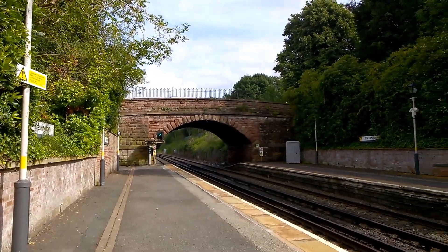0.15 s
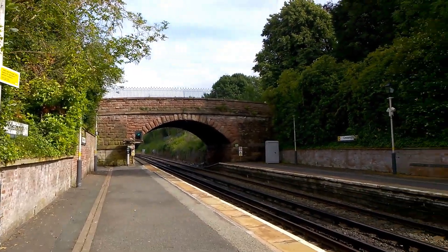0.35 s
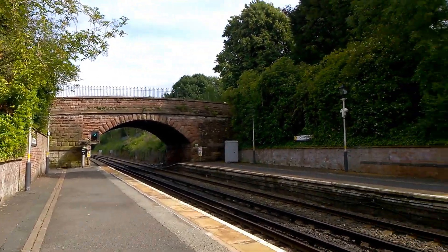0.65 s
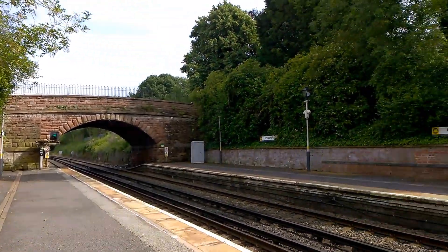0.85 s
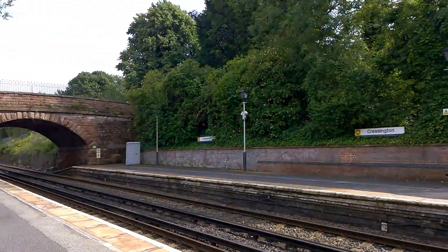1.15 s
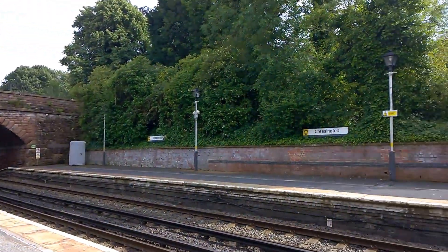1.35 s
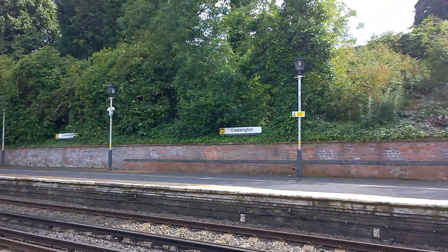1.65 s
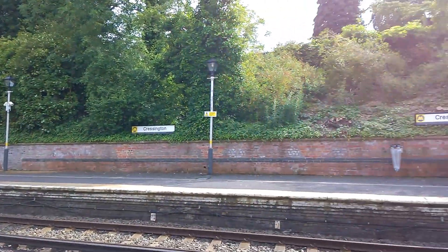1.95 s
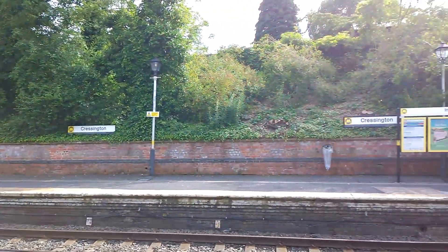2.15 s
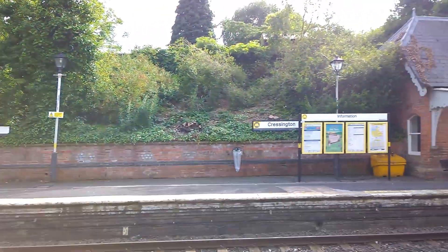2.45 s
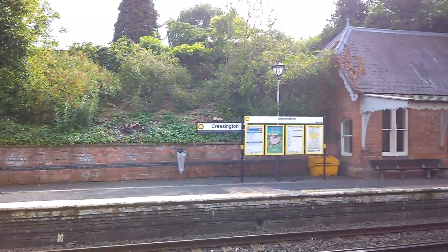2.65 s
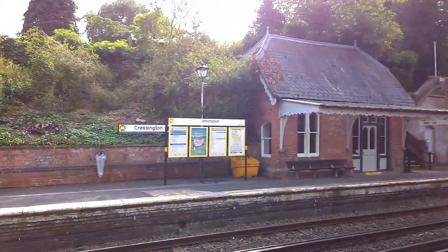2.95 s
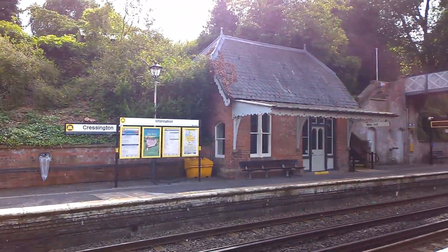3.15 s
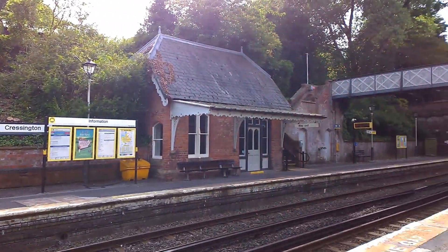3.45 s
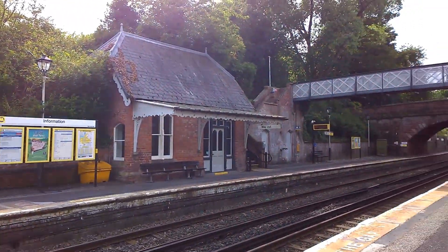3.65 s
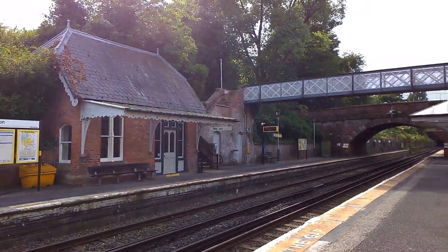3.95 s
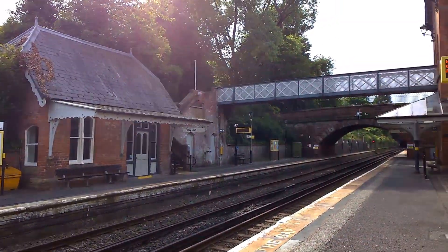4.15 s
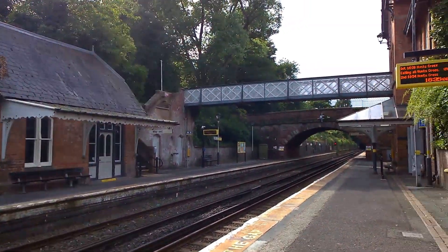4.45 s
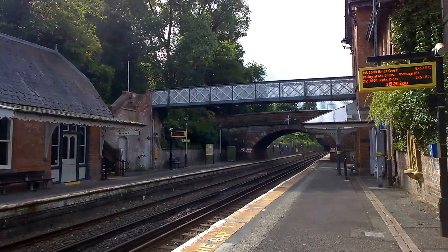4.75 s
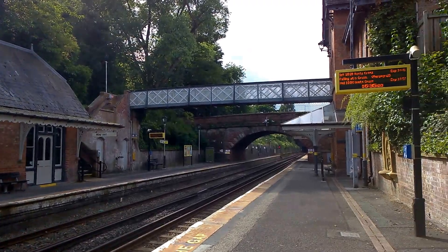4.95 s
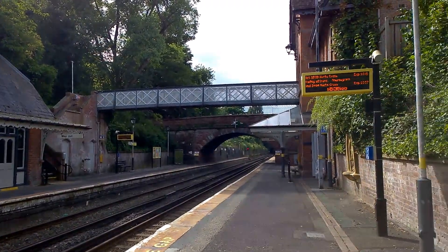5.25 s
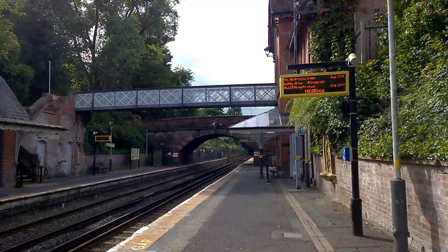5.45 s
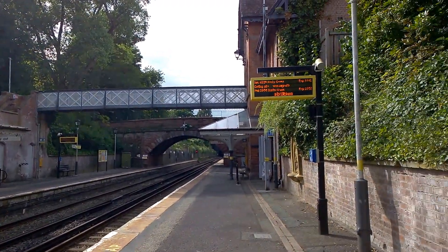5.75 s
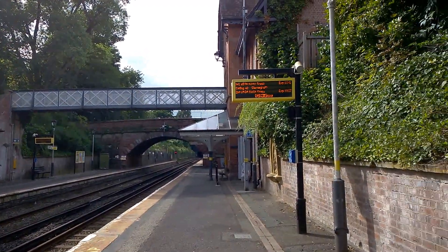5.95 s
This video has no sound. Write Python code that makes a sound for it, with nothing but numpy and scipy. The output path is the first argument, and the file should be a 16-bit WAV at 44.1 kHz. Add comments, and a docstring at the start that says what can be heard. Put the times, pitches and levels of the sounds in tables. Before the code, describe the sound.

Quiet railway platform between walls: faint hiss, leaf rustle to the right, a dull knock and low wind rumble come first. Then a pigeon coos to the end in smooth arching notes with gravelly moments, close to centre, softly echoed. A high buzzy chirp marks the start of the cooing and another comes near the end. Small scuffs and ticks occur sporadically; a weak far whine swells on the right. Open stereo microphone.

```python
"""Pigeon at a railway platform

A pigeon coos low, arching notes in a walled cutting: nearly pure tones that break into throaty flutter.
The walls return each coo as a slap and a short tail of scattered noise echoes.
Two thin bird calls mix a whistle with a buzz of narrow noise; light scuffs are short resonant noise bursts.
Behind lie a faint far whine (tone plus noise), a low rumble, a dull knock, and air and leaf hiss, all shaped noise."""
import sys
import numpy as np
from scipy import signal
from scipy.fft import rfft, irfft, next_fast_len
from scipy.io import wavfile

SR = 44100
rng = np.random.default_rng(int(sys.argv[2]) if len(sys.argv) > 2 else 0)


def master_out(mix):
    """Clip the mix to full scale and print it as 16-bit PCM to the path in sys.argv[1]."""
    frames = np.transpose(np.atleast_2d(mix))
    ceiling = np.clip(frames, -1, 1)
    pcm = np.round(ceiling * 32767).astype(np.int16)
    wavfile.write(sys.argv[1], SR, pcm)


N = 269010
T = np.arange(N) / SR
SIZE = next_fast_len(N + SR // 10, real=True)  # padded, so that filter tails do not wrap round
FREQS = np.fft.rfftfreq(SIZE, 1 / SR)

# Coos, each an arch of pitch; a fall shape over 1 holds the crest longer.
# Each row: start, crest and end in seconds, start, crest and end pitch in Hz before the scoop, fall shape,
# attack in seconds, first and last base level in dB, strain at the crest from 0 to 1.
COO_ROWS = [(1.583, 1.889, 2.11, 353.2, 629.4, 524.4, 2.65, 0.074, -39.5, -38.5, 0),
            (2.33, 2.417, 2.696, 487, 644.2, 383.6, 1.33, 0.054, -39, -39, 0),
            (2.997, 3.064, 3.292, 504, 540.6, 438.3, 2, 0.036, -36.5, -41.5, 0.05),
            (3.29, 3.414, 3.625, 439.5, 484, 373.7, 1.7, 0.065, -40, -38.5, 0.07),
            (3.866, 4.057, 4.074, 483.8, 564.2, 534, 2.3, 0.031, -33.5, -44, 0),
            (4.355, 4.651, 4.95, 496, 586.4, 494.7, 3, 0.045, -40, -39, 1),
            (5.148, 5.244, 5.513, 474, 648.7, 427, 0.72, 0.026, -42.5, -37, 0.75),
            (5.855, 5.9, 6.205, 500, 524.3, 419.6, 1.25, 0.041, -36, -42, 0.01)]
# Brief catches in the voice, all equally deep. Each entry: time in seconds.
CATCH_TIMES_S = [1.669, 1.734, 3.09, 3.148, 3.175, 3.424, 4.056, 4.861, 5.355, 5.404, 6.009]
# What the crop lets through. Each row: frequency in Hz, gain in dB.
CROP_GAIN_DB = [(100, -8), (160, -6.5), (205, -16.5), (280, -4), (335, -6), (400, 1), (645, -2.5),
                (700, -12.5), (770, -1), (950, -8), (1150, -3.5), (1600, -11)]
SCOOP_HZ, SCOOP_S = 84.7, 0.01335  # every coo slides in from below
# Near the pitch the swollen crop favours, the note is loud and pure.
SWEET_HZ, SWEET_WIDTH_HZ, SWEET_DB, SWEET_ROUGH, PLAIN_ROUGH = 523.6, 20.6, 4.5, 0.021, 0.34
# At low pitch the voice goes slack: weaker and rougher.
SLACK_HZ, SLACK_RANGE_HZ, SLACK_DB, SLACK_ROUGH = 518.5, 82, -7.5, 0.46
# Strain at the crest chokes the note and breaks it into flutter.
STRAIN_DB, STRAIN_ROUGH, STRAIN_POWER = -9, 0.8, 3.1
CATCH_DEPTH, CATCH_S, RELEASE_S = 0.98, 0.0047, 0.022
THROB_HZ, THROB_DB, THROB_JITTER = 29.08, 3, 0.4
FLUTTER_HZ, FLUTTER_JITTER, FLUTTER_JITTER_HZ = 52, 0.2963, 35.24
FLUTTER_DEPTH, FLUTTER_BEND_RAD, RASP = 0.62, 0.08, 0.95  # at full roughness

# Thin calls of a small bird.
# Each row: peak in seconds, level in dB before placing, rise and fall in seconds, buzz up to the peak from 0 to 1.
TWEET_ROWS = [(1.57, -65.5, 0.068, 0.093, 0.68), (6.086, -56.5, 0.049, 0.11, 0.5)]
# After its peak a call breaks up into a lower buzz.
TWEET_HZ, BUZZ_HZ, LOW_BUZZ_HZ, BREAK_S, BROKEN_BUZZ = 5214, 5490, 5050, 0.044, 0.97

# Light scuffs and ticks. Each row: time in seconds, level in dB, centre in Hz, width in Hz,
# 60 dB decay in seconds, left minus right in dB.
SCUFF_ROWS = [(0.414, -46.5, 615, 990, 0.02, 1), (1.853, -55, 1040, 290, 0.089, -5),
              (2.38, -55, 1180, 450, .03, 3), (2.392, -48, 860, 439, 0.087, -3),
              (3.803, -58.5, 5340, 2160, .013, 16), (3.8054, -57, 12500, 6000, 0.0068, -4),
              (4.157, -51, 860, 397, 0.098, 4), (4.275, -53.5, 2050, 600, 0.16, -2),
              (4.278, -55, 1194, 300, 0.15, -8), (4.69, -53.5, 1030, 299, 0.18, -1)]

# Swells of the far whine. Each row: peak in seconds, level in dB before placing, rise and fall in seconds.
WHINE_SWELLS = [(0.19, -67.5, 0.079, 0.097), (2.95, -62, 0.45, 2.6), (3.35, -57.5, 0.16, 0.075),
                (3.86, -57.5, 0.067, 0.1), (4.14, -58, 0.1, 0.074), (5.25, -55.5, 0.068, 0.1),
                (6.03, -70, 0.082, 0.23)]
# Hiss around the whine. Each row: frequency in Hz, relative gain in dB.
WHINE_HISS_DB = [(750, -5.5), (900, -5), (1050, 1), (1200, 9), (1450, -13), (2100, -5.5), (2700, -36.5)]
WHINE_HZ, WHINE_WAVER_HZ, WHINE_WAVER_DB = 862, 31, 2.5

# Gusts on the microphone. Each row: peak in seconds, level in dB before the rumble gains, rise and fall in seconds.
GUST_SWELLS = [(0.21, -42, 0.15, 0.13), (1.12, -45.5, 0.16, 0.29), (1.94, -48, 0.06, 0.3),
               (2.68, -50, 0.082, 0.29), (3.43, -49, 0.18, 0.16), (3.77, -42.5, 0.18, 0.076),
               (4.31, -41, 0.086, 0.2), (5.08, -48.5, 0.086, 0.24), (5.72, -52, 0.06, 0.2)]
# Colour of the buffeting. Each row: frequency in Hz, relative gain in dB.
BUFFET_COLOUR_DB = [(8.8, -35), (15, 0), (38, -0.5), (57, -3), (92, -17.5), (120, -24), (160, -51.5),
                    (260, -120)]
# Colour of the low hum. Each row: frequency in Hz, relative gain in dB.
HUM_COLOUR_DB = [(53, -36.5), (90, -0.5), (108, -5), (151, 3), (172, 0), (199, -8.5), (275, -3.5),
                 (325, -12.5), (420, -17), (720, -120)]
# Course of the low hum, with throaty husk beneath some coos.
# Each row: time in seconds, level in dB before waver and channel gains.
HUM_LEVEL_DB = [(0, -54.5), (1.15, -52), (1.55, -55), (1.93, -50.5), (2.6, -57.5), (3.45, -49), (4.6, -55),
                (5.3, -54.5), (6.1, -60)]
GUST_WAVER_HZ, GUST_WAVER_DB = 11, 1.35
BREEZE_DB, BREEZE_WAVER_HZ, BREEZE_WAVER_DB = -53.5, 5.7, 4.5  # light air between gusts, before rumble gains
HUM_WAVER_HZ, HUM_WAVER_DB = 7.2, 1.74

# Steady outdoor air. Each row: frequency in Hz, relative gain in dB.
AIR_COLOUR_DB = [(200, -8.5), (400, -9), (800, -7.5), (1000, -12.5), (1200, -9.5), (1550, -19),
                 (2100, -14.5), (2400, -14.5), (3000, -10.5), (4000, -24), (5900, -20.5), (7400, -31),
                 (10000, -32.5), (15500, -35.5)]
# Balance of the air. Each row: frequency in Hz, left minus right in dB.
AIR_BALANCE_DB = [(100, -1), (380, 2.5), (700, -4), (1300, -1), (2400, -6), (4400, -4), (8000, 0),
                  (15000, 2)]
# Faint dull swells, and the short thud of a knock at 0.42 s.
# Each row: peak in seconds, level in dB, rise and fall in seconds.
DULL_SWELLS = [(0.22, -60, 0.029, 0.062), (0.42, -56.5, 0.01, 0.012), (0.95, -59, 0.28, 0.12),
               (1.245, -53.5, 0.062, 0.07)]
# Stirs of leaves. Each row: peak in seconds, level in dB before waver and channel gains, rise and fall in seconds.
LEAF_SWELLS = [(0.01, -66, 0.1, 0.08), (0.8, -66, 0.36, 0.44), (1.4, -66, 0.63, 0.99),
               (2.25, -66, 0.26, 0.13)]
# Colour of the leaves. Each row: frequency in Hz, relative gain in dB.
LEAF_COLOUR_DB = [(1700, -38.5), (2100, -17.5), (2350, 2.5), (2600, -12.5), (2900, 3), (3200, -13.5),
                  (3700, -37)]
TOP_HZ = 15750


def pigeon():
    """The coos through the crop, their slap off the far wall and their tail along the platform."""
    catches = sum(np.exp(-((T - s) / CATCH_S) ** 2) for s in CATCH_TIMES_S)
    flow = 1 - CATCH_DEPTH * catches
    song = flow * sum(coo(row) for row in COO_ROWS)
    voice = colour(song, undb(over_hz(CROP_GAIN_DB)))
    slap = np.interp(T - 0.098, T, voice, left=0)  # 98 ms later
    tail = cutting(voice, t60_s=0.65, gap_s=0.034, width=0.49)
    direct = undb(2.5) * place(voice, 0.3, lag_ms=0.14)
    return direct + undb(-12.5) * place(slap, 0, lag_ms=0.082) + undb(-11) * tail


def coo(row):
    """A nearly pure tone; a fast uneven flutter chops and bends it as the voice roughens."""
    hz, gain, rough = gesture(*row)
    flutter_hz = FLUTTER_HZ * (1 + FLUTTER_JITTER * wander(FLUTTER_JITTER_HZ))
    beat = turn(flutter_hz)
    phase = turn(hz) + FLUTTER_BEND_RAD * rough * np.sin(beat)
    chop = 1 + FLUTTER_DEPTH * rough * np.cos(beat)
    # no two cycles are alike when the voice is rough
    scatter = RASP * rough * (wander(130) * np.sin(phase) + wander(110) * np.cos(phase))
    # roughness spreads the power without adding to it
    power = 1 + (FLUTTER_DEPTH * rough) ** 2 / 2 + 2 * (RASP * rough) ** 2
    tone = (chop * np.sin(phase) + scatter) * np.sqrt(2 / power)
    half = undb(-22) * rough * np.sin(phase / 2)
    second = undb(-40) * np.sin(2 * phase)
    # turbulent air in the throat, mostly below the note
    breath = undb(-13.5) * noise(band(330, 450)) + undb(-26) * noise(band(590, 430))
    husk = (0.37 + rough) * breath
    return (tone + chop * (half + second + husk)) * gain * throb(rough)


def gesture(start, crest, end, start_hz, crest_hz, end_hz, fall_shape, attack_s, first_db, last_db, strain):
    """Pitch, gain and roughness of one coo: the pitch arches, and loudness and roughness follow it."""
    rise = np.clip((crest - T) / (crest - start), 0, 1)
    fall = np.clip((T - crest) / (end - crest), 0, 1)
    hz = crest_hz - (crest_hz - start_hz) * rise ** 2 - (crest_hz - end_hz) * fall ** fall_shape
    hz = hz - SCOOP_HZ * np.exp(-np.maximum(T - start, 0) / SCOOP_S)

    sweet = 1 / (1 + ((hz - SWEET_HZ) / SWEET_WIDTH_HZ) ** 2)
    slack = np.clip((SLACK_HZ - hz) / SLACK_RANGE_HZ, 0, 1)
    height = np.clip((hz - end_hz) / (crest_hz - end_hz), 0, 1)
    forced = strain * height ** STRAIN_POWER

    rough = SWEET_ROUGH * sweet + PLAIN_ROUGH * (1 - sweet)
    rough = rough + SLACK_ROUGH * slack + STRAIN_ROUGH * forced
    db = np.interp(T, [start, end], [first_db, last_db])
    db = db + SWEET_DB * sweet + SLACK_DB * slack + STRAIN_DB * forced
    attack = np.clip((T - start) / attack_s, 0, 1)
    release = np.clip(1 - (T - end) / RELEASE_S, 0, 1)
    return hz, attack * release * undb(db), np.clip(rough, 0, 1)


def throb(rough):
    """Gain of the slow, uneven pulsing of the throat, deeper the rougher the voice."""
    cycle = turn(THROB_HZ * (1 + THROB_JITTER * wander(20)))
    return undb(THROB_DB * np.sqrt(rough) * np.cos(cycle))


def cutting(x, t60_s, gap_s, width):
    """Scattered echoes as decaying stereo noise after a short gap."""
    t = T[:SR]
    fade = np.exp(-np.log(1000) * t / t60_s) * (t > gap_s)
    mid, side = rng.standard_normal((2, SR)) * fade / np.sqrt(np.sum(fade ** 2))
    echoes = np.array([mid + width * side, mid - width * side])
    return signal.fftconvolve(x[None], echoes, axes=1)[:, :N]


def small_bird():
    """High wavering whistles with a buzzy edge of narrow noise, smeared by the trees."""
    song = 0
    for peak_s, db, rise_s, fall_s, first_buzz in TWEET_ROWS:
        broken = np.clip((T - peak_s) / BREAK_S, 0, 1)
        buzz = np.clip(first_buzz * (1 - broken) + BROKEN_BUZZ * broken, 0, 1)
        whistle = np.sin(turn(TWEET_HZ + 70 * buzz * wander(170)))
        edge = np.sqrt(1 - broken) * noise(band(BUZZ_HZ, 800))
        edge = edge + np.sqrt(broken) * noise(band(LOW_BUZZ_HZ, 850))
        call = np.sqrt(2 - 2 * buzz ** 2) * whistle + buzz * edge
        song = song + call * swell(peak_s, db, rise_s, fall_s)
    smear = cutting(song, t60_s=0.51, gap_s=0.012, width=1)
    return undb(-3.5) * place(song, -1, lag_ms=0.035) + undb(-1.5) * smear


def scuffs():
    """Short gritty contacts, each a decaying noise burst in one broad resonance."""
    out = 0
    for s, db, hz, width_hz, t60_s, pan_db in SCUFF_ROWS:
        decay = (T >= s) * np.exp(-np.log(1000) * np.abs(T - s) / t60_s)
        burst = rng.standard_normal(N) * decay
        contact = colour(burst, unit(band(hz, width_hz))) * undb(db)
        out = out + place(contact, pan_db, lag_ms=-0.12)
    return out


def whine():
    """A faint far note, a wavering sine with narrow noise, swells and fades with some hiss around it."""
    tone = np.sqrt(2) * np.sin(turn(WHINE_HZ + 5 * wander(13.1)))
    tone = 0.9 * tone + 0.42 * noise(band(WHINE_HZ, 32))
    level = swells(WHINE_SWELLS)
    size = level * undb(WHINE_WAVER_DB * wander(WHINE_WAVER_HZ))
    hiss = stereo_noise(undb(over_hz(WHINE_HISS_DB)), lag_ms=-0.3, diffuse=0.38)
    # the hiss swells less than the note does
    hiss = hiss * undb(-64) * (size / np.max(level)) ** 0.3
    return place(tone * size, -10.5, lag_ms=-0.17) + hiss * undb(np.array([[-5], [3]]))


def rumble():
    """Air buffets the microphone over a low hum with husk beneath some coos, both as low shaped noise."""
    gusts = swells(GUST_SWELLS) * undb(GUST_WAVER_DB * wander(GUST_WAVER_HZ))
    breeze = undb(BREEZE_DB + BREEZE_WAVER_DB * wander(BREEZE_WAVER_HZ))
    wind = np.hypot(gusts, breeze)
    buffeting = spread(undb(over_hz(BUFFET_COLOUR_DB)), 0.28) * wind * undb(1.7)
    hum_db = np.interp(T, *np.transpose(HUM_LEVEL_DB)) + HUM_WAVER_DB * wander(HUM_WAVER_HZ)
    hum = spread(undb(over_hz(HUM_COLOUR_DB)), 0.14) * undb(hum_db)
    return (buffeting + hum) * undb(np.array([[1.5], [-1.8]]))


def air():
    """Wide steady hiss, dull swells and a knock, and leaves that rustle on the right, all shaped noise."""
    hiss = stereo_noise(undb(over_hz(AIR_COLOUR_DB)), lag_ms=-0.16, diffuse=1.97)
    hiss = hiss * undb(-64 + 0.61 * wander(11))
    hiss = colour(hiss, undb(np.array([[1], [-1]]) * over_hz(AIR_BALANCE_DB) / 2))
    dull = spread(band(326, 294), 0.24) * swells(DULL_SWELLS)
    leaves = stereo_noise(undb(over_hz(LEAF_COLOUR_DB)), lag_ms=-0.07, diffuse=1)
    leaves = leaves * undb(3.25 * wander(19)) * swells(LEAF_SWELLS)
    return hiss + dull + leaves * undb(np.array([[-16], [-1]]))


def swell(peak_s, db, rise_s, fall_s):
    """A gain that grows smoothly to its peak and dies away."""
    return undb(db) * np.exp(-((T - peak_s) / np.where(T < peak_s, rise_s, fall_s)) ** 2)


def swells(rows):
    """The gain of several swells, added in power."""
    return np.sqrt(sum(swell(*row) ** 2 for row in rows))


def turn(hz):
    """Phase in radians of a changing frequency."""
    return 2 * np.pi * np.cumsum(hz) / SR


def noise(gain):
    """Noise of rms 1, coloured by a gain per frequency."""
    return unit(colour(rng.standard_normal(SIZE), gain))


def wander(rate_hz):
    """Smooth chance with spread 1: noise below about rate_hz."""
    return noise(np.exp(-(FREQS / rate_hz) ** 2))


def spread(gain, width):
    """Stereo noise: a shared part and an opposed part."""
    return noise(gain) + width * np.array([[1], [-1]]) * noise(gain)


def stereo_noise(gain, lag_ms, diffuse):
    """Noise from one direction plus a share from all around."""
    around = np.array([noise(gain), noise(gain)])
    return (place(noise(gain), 0, lag_ms) + diffuse * around) / np.sqrt(1 + diffuse ** 2)


def place(x, pan_db, lag_ms):
    """Two channels: left minus right is pan_db, and the left lags by lag_ms (leads if negative)."""
    return np.array([delay(x, lag_ms) * undb(pan_db / 2), x * undb(-pan_db / 2)])


def delay(x, ms):
    """Shift in time by a phase slope over frequency."""
    return colour(x, np.exp(-2j * np.pi * FREQS * ms / 1000))


def colour(x, gain):
    """Filter by a gain per frequency."""
    return irfft(rfft(x, SIZE) * gain, SIZE)[..., :N]


def band(hz, width_hz):
    """Gain of a steep resonance."""
    return 1 / (1 + ((FREQS ** 2 - hz ** 2) / (width_hz * FREQS + 1)) ** 2)


def over_hz(points):
    """A (Hz, value) table at every frequency, interpolated over log frequency."""
    hz, value = np.transpose(points)
    return np.interp(np.log(FREQS + 1), np.log(hz), value)


def undb(db):
    """Decibels to gain."""
    return 10 ** (np.asarray(db) / 20)


def unit(x):
    """Scale to rms 1."""
    return x / np.sqrt(np.mean(x ** 2))


def scene():
    """Everything heard from the platform."""
    return pigeon() + small_bird() + scuffs() + whine() + rumble() + air()


def record(dry):
    """The recorder cuts the top: a steep elliptic low-pass."""
    lowpass = signal.ellip(10, 0.2, 70, TOP_HZ, fs=SR, output="sos")
    return signal.sosfilt(lowpass, dry)


dry = scene()
out = record(dry)
master_out(out)
```